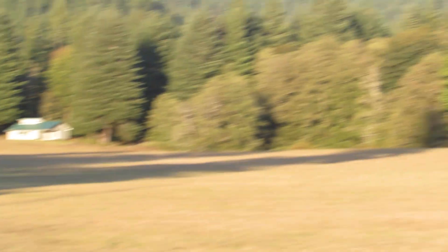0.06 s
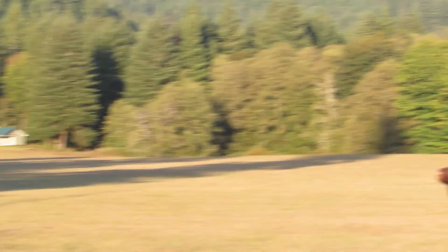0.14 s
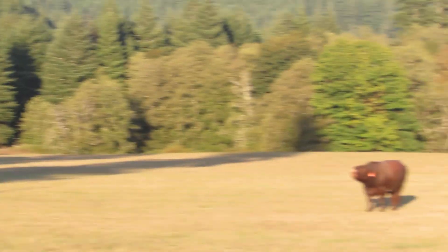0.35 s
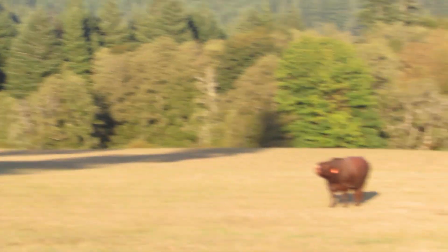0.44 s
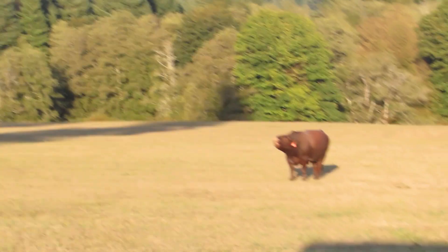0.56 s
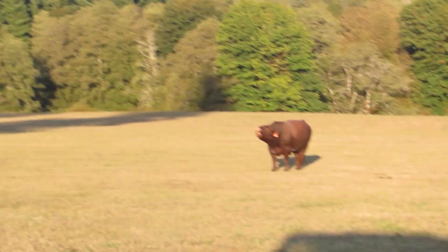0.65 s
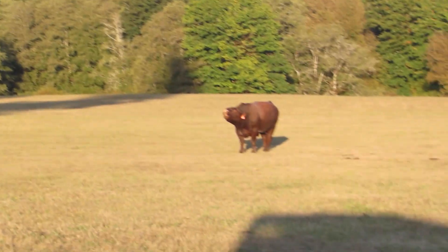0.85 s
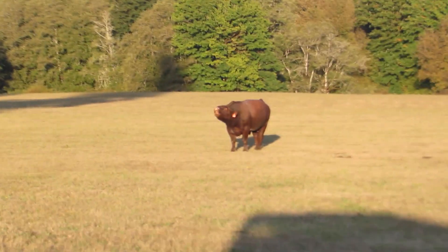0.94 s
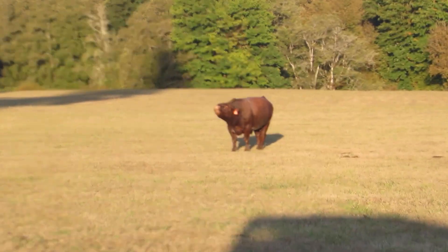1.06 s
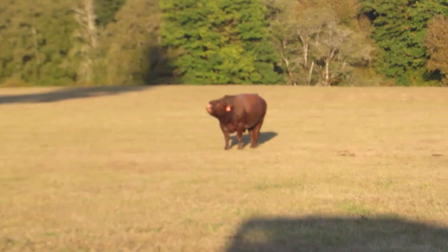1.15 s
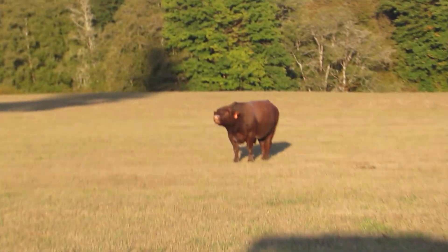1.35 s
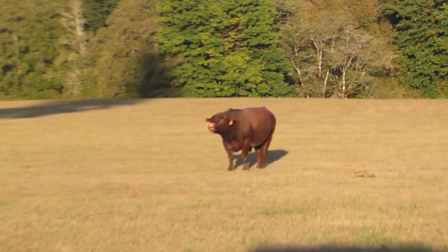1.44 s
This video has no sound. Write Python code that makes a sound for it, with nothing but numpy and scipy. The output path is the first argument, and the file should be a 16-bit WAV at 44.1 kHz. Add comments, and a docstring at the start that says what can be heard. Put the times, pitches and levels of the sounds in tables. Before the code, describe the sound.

A bull bellows once across an open field, rising into a high, harsh call.

```python
"""A bull bellows once across a field, a little right of the camera's stereo microphone. His closed-mouth
hum breaks upward into a high call as the vocal folds pulse through the opening mouth; it turns harsh
where a second vibration joins the folds, clears, and drops away. The tree line answers faintly.
To the left an insect trills with its wings over low outdoor noise.
Right at the microphone, fingers tick and rub on the camera body."""
import sys
import numpy as np
from scipy import signal
from scipy.fft import rfft, irfft
from scipy.io import wavfile
from scipy.ndimage import map_coordinates

SR = 44100
rng = np.random.default_rng(int(sys.argv[2]) if len(sys.argv) > 2 else 0)


def bounce(signal):
    """Save signal as a 16-bit WAV file at the path given by the first command-line argument."""
    frames = np.transpose(np.atleast_2d(signal))
    limited = np.clip(frames, -1, 1)
    pcm = np.round(limited * 32767).astype(np.int16)
    wavfile.write(sys.argv[1], SR, pcm)


N = 66150
TIME = np.arange(N) / SR
TOP_HZ = 14700  # upper limit of the overtones and of the camera


def bull():
    """Vocal-fold pulses, rasp and hiss pass through the mouth; roughness shakes pitch and level."""
    # The vocal folds. Each row: time in seconds, pitch in Hz.
    pitch = [(.18, 160.6), (.228, 168.3), (.25, 160.6), (.29, 171.2), (.34, 181), (.365, 220.9), (.4, 244),
             (.45, 268.7), (.5, 288), (.576, 310.7), (.636, 321.8), (.78, 317.5), (.86, 322.9),
             (1.056, 325.3), (1.098, 315.5), (1.12, 295.9), (1.16, 255.6), (1.22, 200)]
    # Strength of the call. Each row: time in seconds, level in dB.
    effort = [(.17, -87), (.2, -41), (.222, -31), (.27, -28), (.34, -29.5), (.38, -31), (.5, -27.5),
              (.54, -25), (.58, -25.5), (.65, -27), (.72, -28.5), (.81, -25), (.86, -23.5), (.97, -21),
              (1.04, -22.5), (1.095, -19), (1.118, -21.5), (1.156, -24), (1.175, -36), (1.23, -49)]
    # Unevenness of the folds. Each row: time in seconds, roughness from 0 to 1.
    roughness = [(.2, .26), (.25, .26), (.3, .17), (.345, .22), (.39, .55), (.44, .36), (.5, .13),
                 (.57, .12), (.68, .34), (.82, .34), (.87, .14), (1.09, .08), (1.135, .27), (1.2, .22)]
    waver, jitter, shimmer_db, hiss_hz = .0017, .012, 4, 3900
    rough = curve(roughness)
    hz = curve(pitch) * (1 + waver * wobble(35.1) + jitter * rough * (wobble(59.9) + 2 * wobble(300)))
    phase = turns(hz)
    # Above hiss_hz the overtones give way to hiss.
    folds = filtered(fold_pulses(phase, hz).real, lambda f: 1 / np.sqrt(1 + (f / hiss_hz) ** 6))
    hiss = amp(1) * filtered(rng.standard_normal(N), lambda f: 1 - 1 / (1 + (f / hiss_hz) ** 4))
    puffs = (1 + .4 * np.cos(phase - .8)) ** 2
    rasp = amp(4.5) * rough * unit(puffs * rng.standard_normal(N))
    shimmer = amp(shimmer_db * rough * wobble(250))
    throat = (folds * shimmer + rasp + hiss) / np.sqrt(1 + rough ** 2) * amp(curve(effort))
    sounding = np.clip((TIME - .146) / .01, 0, 1) * np.clip((1.26 - TIME) / .02, 0, 1)
    return sounding * (mouth(throat) + second_vibration(folds, hz) + hum_and_boom(phase))


def fold_pulses(phase, hz, count=42, flutter_db=1.4):
    """One sharp pulse per cycle of the folds, as a complex wave; each overtone flutters a little."""
    train = sum(np.exp(1j * k * phase) * (k * hz < TOP_HZ) * amp(flutter_db * wobble(14.25))
                for k in range(1, count + 1))
    return train * 2 * np.sqrt(hz / SR)


def mouth(throat):
    """The mouth opens and rounds off, blending from one set of resonances to the next."""
    # Each row: time in seconds, shape (0 nearly shut, 1 half open, 2 wide, 3 rounded).
    movement = [(.33, 0), (.46, 1), (.54, 1), (.62, 1.55), (.68, 1.75), (.86, 2), (1.04, 2), (1.09, 2.8),
                (1.145, 3)]
    # Resonances of the four shapes. Each row: frequency in Hz, relative gain in dB.
    near_shut = [(100, -56), (200, -17), (340, -18), (510, -11.5), (770, 3), (880, -9), (1010, -14),
                 (1200, 5), (1370, 1), (1560, 3), (1730, -13), (1900, 2.5), (2080, -12.5), (2270, 2),
                 (2480, -13.5), (2800, -16.5), (3400, -18.5), (4200, -34.5), (13000, -49.5)]
    half_open = [(100, -74), (200, -12), (300, -13.5), (430, -17.5), (600, -13.5), (760, -3.5), (980, -3.5),
                 (1250, -8.5), (1480, 4), (1800, -7), (2080, -9), (2380, -1), (2680, -11.5), (3000, -21),
                 (3500, -25), (4200, -39.5), (7000, -40), (13000, -58)]
    wide_open = [(100, -28), (200, -37), (322, -9), (450, -42), (645, -8), (968, 0), (1100, 7.5),
                 (1245, -4.5), (1300, 5.5), (1450, -3), (1610, -9.5), (1935, -1.5), (2260, 1), (2580, -8.5),
                 (2900, -16.5), (3230, -13), (3600, -27.5), (4200, -38.5), (5000, -25.5), (6000, -53),
                 (7200, -27.5), (9000, -45), (13000, -46)]
    rounded = [(100, -45), (300, -17), (560, -14), (780, -3), (950, -5), (1080, -7), (1270, 4), (1400, -1),
               (1560, -2), (1900, -13), (2250, -14), (2600, -17), (3200, -22), (4200, -37), (13000, -44)]
    shape = curve(movement)
    return sum(coloured(throat * np.maximum(0, 1 - np.abs(shape - k)), colour)
               for k, colour in enumerate([near_shut, half_open, wide_open, rounded]))


def second_vibration(folds, fold_hz):
    """A second vibration in the throat adds its own tone and harsh side tones around the overtones."""
    # Its strength. Each row: time in seconds, level in dB.
    strength = [(.55, -82), (.63, -42), (.68, -28), (.76, -26), (.83, -32), (.86, -39), (.93, -58)]
    # Its colour. Each row: frequency in Hz, relative gain in dB.
    harsh_colour = [(100, -47), (190, -3.5), (320, 9), (450, -17), (620, -31), (765, 10), (890, 0),
                    (1080, -3), (1400, 2.5), (1550, -18.5), (1760, 9), (2050, -37), (2400, 1),
                    (2800, -17.5), (3400, -22), (4200, -60), (13000, -53)]
    second_hz, waver, octave_db, under_db = 446, .002, -1.5, -6.5
    second = np.exp(1j * turns(second_hz * (1 + waver * wobble(69))))
    shifts = second + amp(octave_db) * second ** 2 + amp(under_db) / second
    side_tones = (signal.hilbert(folds) + 2 * np.sqrt(fold_hz / SR)) * shifts
    return coloured(side_tones.real * amp(curve(strength)), harsh_colour)


def hum_and_boom(phase):
    """A deep hum comes before the mouth opens; the fundamental booms while it is nearly shut."""
    # The hum. Each row: time in seconds, pitch in Hz, level in dB.
    hum_course = [(.172, 152.3, -60), (.195, 158, -32), (.222, 172, -22.5), (.24, 165, -23),
                  (.258, 149.6, -30.5), (.285, 172, -21.5), (.325, 172.3, -19), (.36, 173, -21),
                  (.4, 176, -27.5), (.45, 176.6, -35.5), (.5, 187, -63), (.53, 180, -74)]
    # The fundamental. Each row: time in seconds, level in dB.
    boom_level = [(.31, -67), (.345, -29.5), (.38, -32.5), (.45, -32.5), (.5, -41.5), (.56, -39.5),
                  (1.1, -70), (1.135, -33.5), (1.16, -25.5), (1.195, -31), (1.225, -37), (1.26, -80)]
    hum = amp(curve(hum_course, column=2)) * np.sin(turns(curve(hum_course)))
    boom = amp(curve(boom_level)) * np.cos(phase)
    return np.sqrt(2) * (hum + boom)


def tree_line(voice, delay_s=.03):
    """A diffuse answer from the trees; each frequency dies at its own speed."""
    # The echo's decay. Each row: frequency in Hz, seconds to fall by 60 dB.
    decay = [(200, 0.37), (1200, 0.82), (3000, 0.93), (10000, 0.35)]
    hz, t, noise = signal.stft(rng.standard_normal((2, SR)), SR, nperseg=256)
    tail = signal.istft(noise * amp(-60 * t / along(decay, hz)[:, None]), SR, nperseg=256)[1]
    late = np.pad(voice, (int(delay_s * SR), 0))
    return signal.fftconvolve(late[None], tail / np.linalg.norm(tail[0]), axes=1)[:, :N]


def handling():
    """The grip rumbles and the body ticks; the flexing case pushes the two capsules in opposition."""
    # Fingers rubbing. Each row: time in seconds, level in dB.
    grip_level = [(0, -53), (.58, -60), (.66, -32.5), (.72, -48), (.78, -54), (.85, -38), (.95, -45),
                  (1.03, -22.5), (1.1, -38), (1.18, -33), (1.25, -34.5), (1.33, -40), (1.4, -32),
                  (1.5, -32)]
    # The body ticking. Each row: start in seconds, click level in dB, thump level in dB.
    ticks = [(.6995, -24, -45), (.8855, -27, -55), (.9738, -15, -24), (1.0005, -45, -26), (1.030, -36, -19)]
    # Colours of rub, click and thump. Each row: frequency in Hz, relative level in dB.
    grip_colour = [(20, -7), (45, -1), (100, -8.5), (220, -9.5), (380, -6), (600, -20.5), (1500, -35),
                   (5000, -55)]
    click_colour = [(200, -8), (700, 6), (1600, 3), (3000, -5), (5000, -11), (8500, -11), (14000, -19)]
    thump_colour = [(25, 5), (60, -11), (150, 1), (350, 7), (700, 8), (2000, -40)]
    rumble = stereo_noise(grip_colour, likeness=[(60, -.91), (400, -.88)])
    rumble *= amp(curve(grip_level) + 1.5 * wobble(25.19))
    clicks, thumps = np.zeros(N), np.zeros(N)
    for start, click_db, thump_db in ticks:
        age = TIME - start
        burst = lambda t60_s: (age >= 0) * amp(-60 * np.abs(age) / t60_s) * rng.standard_normal(N)
        clicks += amp(click_db) * burst(t60_s=.014)
        thumps += amp(thump_db) * burst(t60_s=.045)
    opposed_thumps = coloured(thumps, thump_colour) * np.array([[1], [-.5]])
    return rumble + panned(coloured(clicks, click_colour), pan_db=8) + opposed_thumps


def insect():
    """A faint trill off to the left: each wing stroke is a short falling tone."""
    offset_s, period_s, centre_hz, fall_hz, level_db = .009, .02412, 3372, 392, -50
    stroke = (TIME - offset_s) / period_s % 1
    tone = np.sin(turns(centre_hz - fall_hz * (stroke - .5) + 25 * wobble(300)))
    swell = np.abs(np.sin(np.pi * stroke)) ** 2.6
    return panned(np.sqrt(2) * tone * swell * amp(level_db + 2.1 * wobble(30.17)), pan_db=8.5)


def field_ambience():
    """Low, slightly restless outdoor noise with a faint hiss, all around the microphone."""
    # Its colour. Each row: frequency in Hz, relative level in dB.
    colour = [(25, -45), (150, -15), (300, 2), (450, -2.5), (560, -3), (800, 0.5), (1150, -5),
              (1600, -13.5), (3000, -19), (4500, -23.5), (7000, -25.5), (10000, -30), (13000, -34.5),
              (15000, -54)]
    # Its slow rise. Each row: time in seconds, level in dB.
    level = [(0, -42.5), (.3, -40.5), (.9, -37), (1.3, -36.5), (1.5, -37)]
    # Its width. Each row: frequency in Hz, left-right likeness from -1 to 1.
    likeness = [(50, 0.0053), (300, -0.96), (1000, -0.46), (5000, 0.16)]
    return panned(stereo_noise(colour, likeness) * amp(curve(level) + wobble(12.5)), pan_db=2)


def stereo_noise(colour, likeness):
    """Coloured stereo noise of rms 1 with a given left-right likeness at each frequency."""
    def response(hz):
        angle = np.arccos(np.clip(along(likeness, hz), -1, 1)) / 2
        return amp(along(colour, hz)) * [np.cos(angle), np.sin(angle)]
    mid, side = filtered(rng.standard_normal((2, N)), response)
    return unit(np.array([mid + side, mid - side]))


def amp(db):
    """Decibels to gain."""
    return 10 ** (np.asarray(db) / 20)


def unit(x):
    """Scale to rms 1."""
    return x / np.sqrt(np.mean(x ** 2) + 1e-20)


def along(points, hz):
    """Interpolate (Hz, value) points on a log frequency axis."""
    knots_hz, values = np.transpose(points)
    return np.interp(np.log(hz + 1), np.log(knots_hz + 1), values)


def curve(rows, column=1):
    """One value per sample from a column of a time table."""
    columns = np.transpose(rows)
    return np.interp(TIME, columns[0], columns[column])


def wobble(rate):
    """A smooth random curve, rate knots a second."""
    return map_coordinates(rng.standard_normal(int(N * rate / SR) + 4), [TIME * rate])


def turns(hz):
    """Running phase of a frequency curve, in radians."""
    return 2 * np.pi * np.cumsum(hz) / SR


def filtered(x, response):
    """Multiply the spectrum of x by a function of frequency."""
    size = 2 * N
    return irfft(rfft(x, size) * response(np.fft.rfftfreq(size, 1 / SR)), size)[..., :N]


def coloured(x, points):
    """Causal filter with the given colour; keeps the power of a flat input."""
    def response(hz):
        cepstrum = irfft(np.log(unit(amp(along(points, hz)))))
        cepstrum[1:N] *= 2
        cepstrum[N + 1:] = 0
        return np.exp(rfft(cepstrum))
    return filtered(x, response)


def panned(x, pan_db):
    """Mono to stereo, left louder by pan_db."""
    return x * amp(np.array([[.5], [-.5]]) * pan_db)


def scene():
    """The bull across the field, a little to the right, with everything around him."""
    # His place between the channels. Each row: frequency in Hz, left minus right in dB.
    bull_pan = [(170, 2), (330, -4), (700, -6), (1300, -5), (2200, -3), (6000, -2.5)]
    voice = bull()
    direct = filtered(voice, lambda hz: panned(1, along(bull_pan, hz)))
    return direct + amp(-15) * tree_line(voice) + insect() + field_ambience() + handling()


def record(dry):
    """The camera cuts two narrow notches and everything above its band limit."""
    # The notch filters. Each row: centre in Hz, half width in Hz.
    notches = [(3950, 110), (7900, 110)]
    def response(hz):
        cuts = [1 - np.exp(-((hz - centre) / width) ** 2) for centre, width in notches]
        return np.prod(cuts, axis=0) / np.sqrt(1 + (hz / TOP_HZ) ** 120)
    return filtered(dry, response)


dry = scene()
out = record(dry)
bounce(out)
```